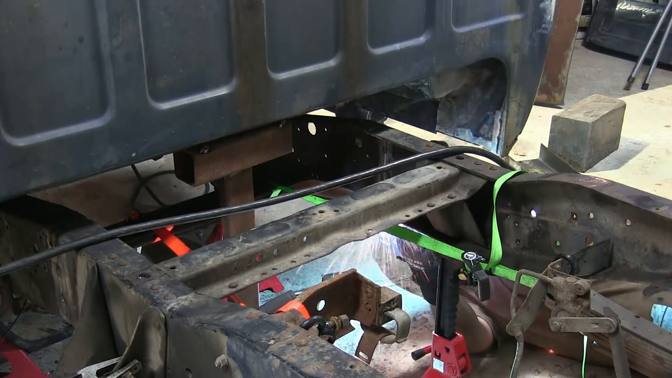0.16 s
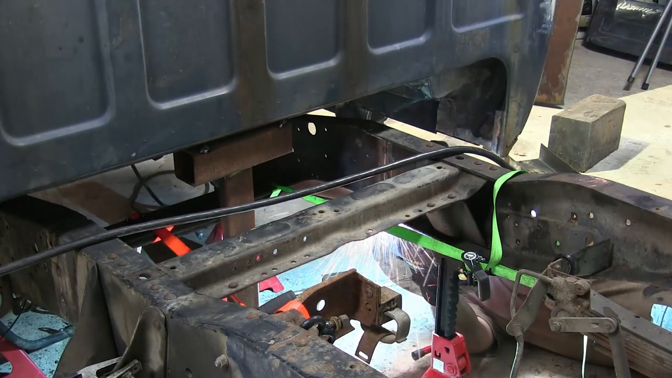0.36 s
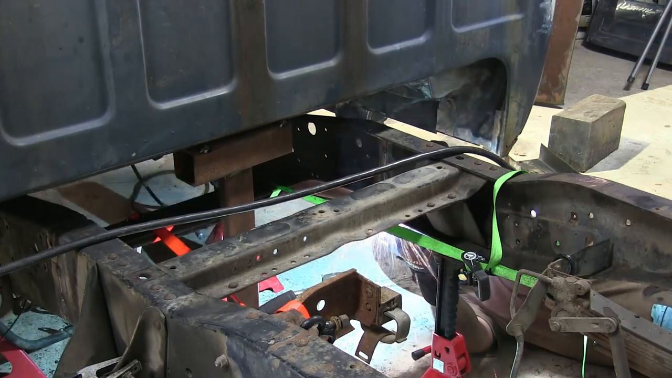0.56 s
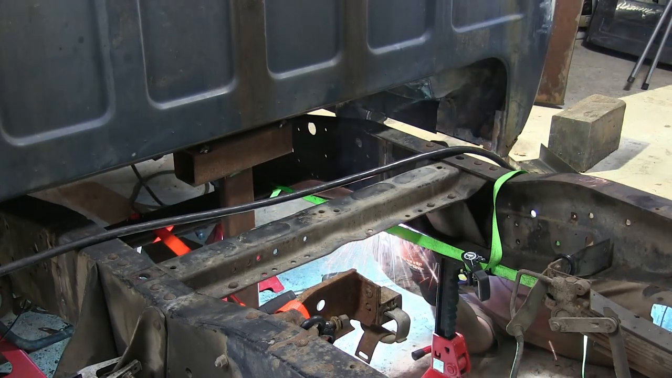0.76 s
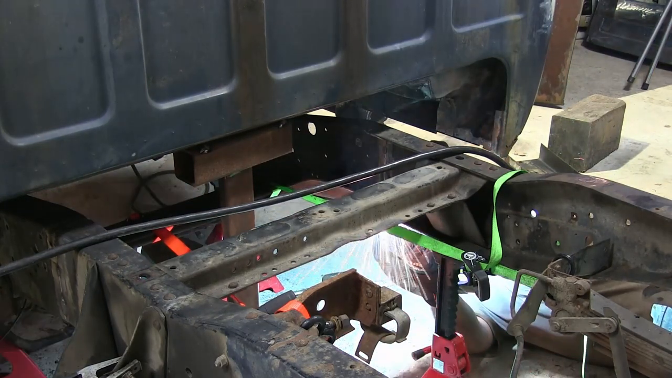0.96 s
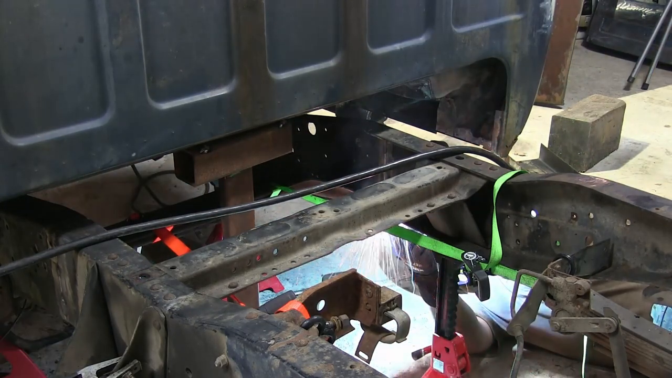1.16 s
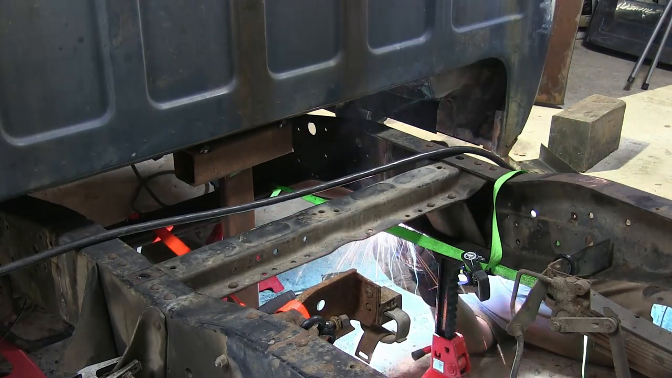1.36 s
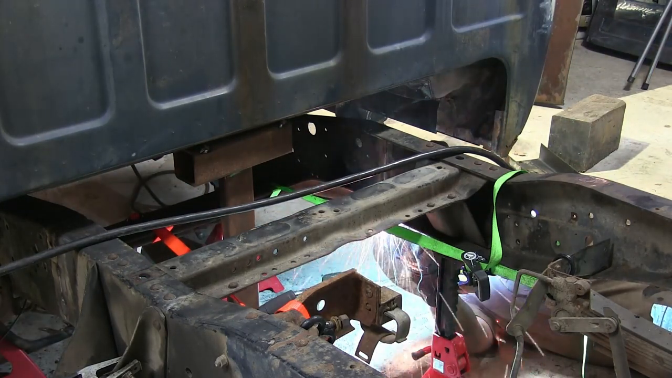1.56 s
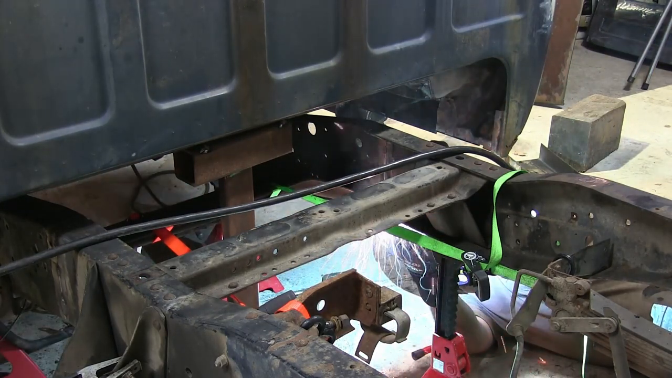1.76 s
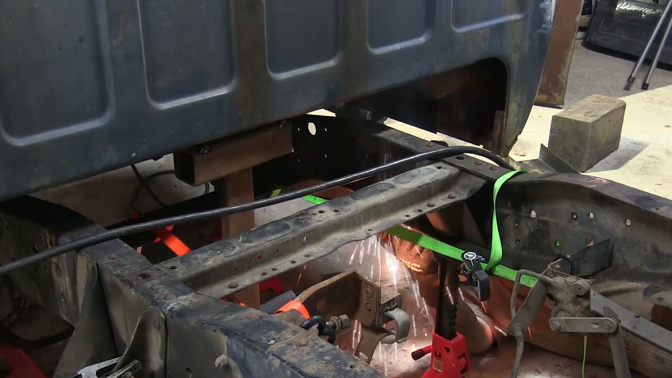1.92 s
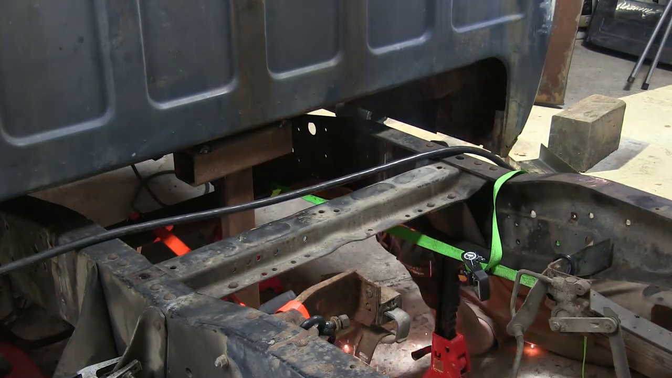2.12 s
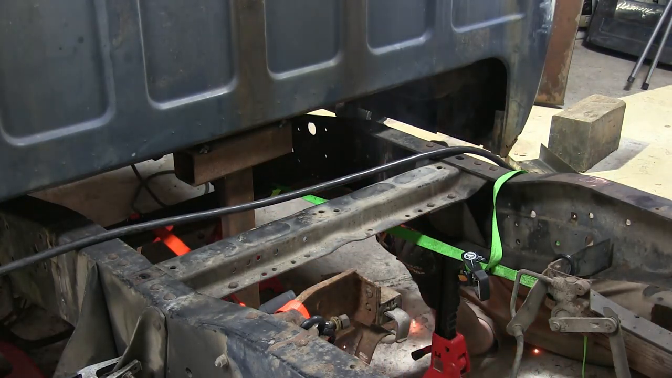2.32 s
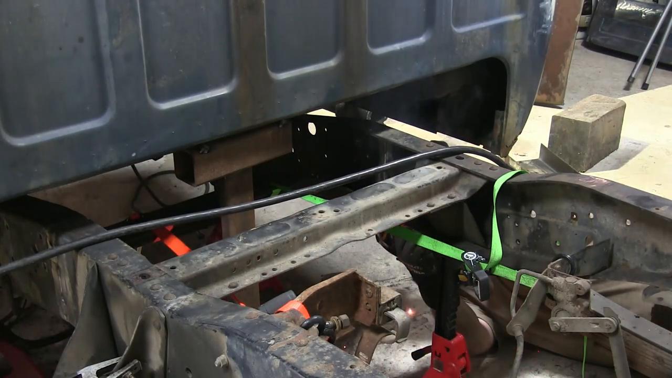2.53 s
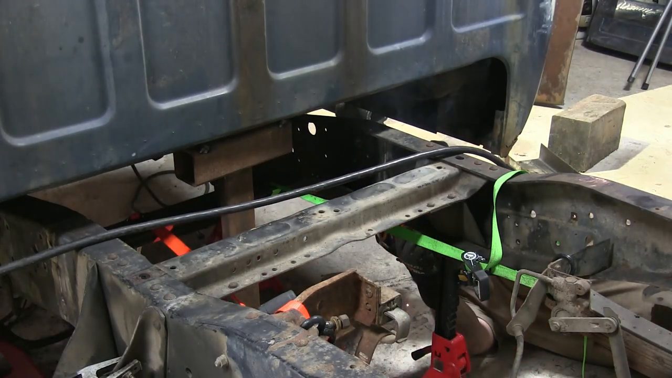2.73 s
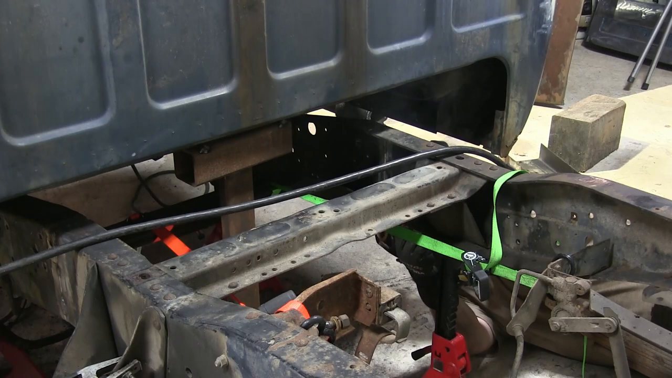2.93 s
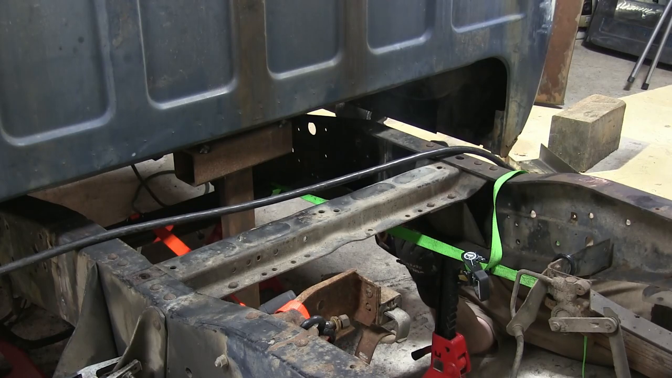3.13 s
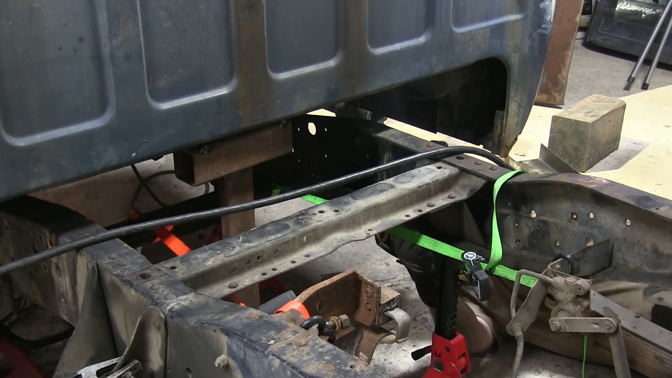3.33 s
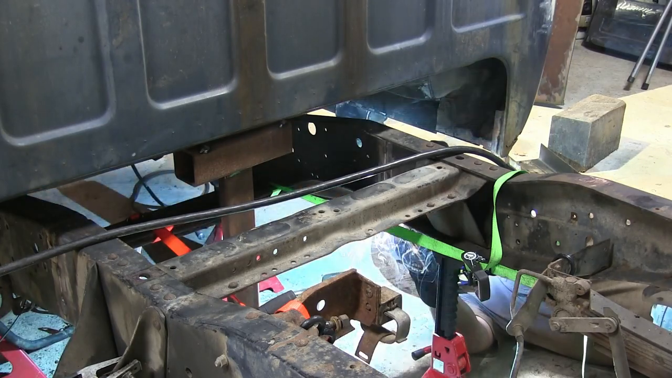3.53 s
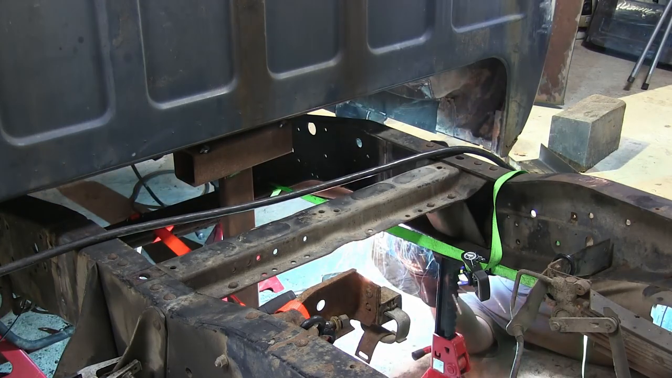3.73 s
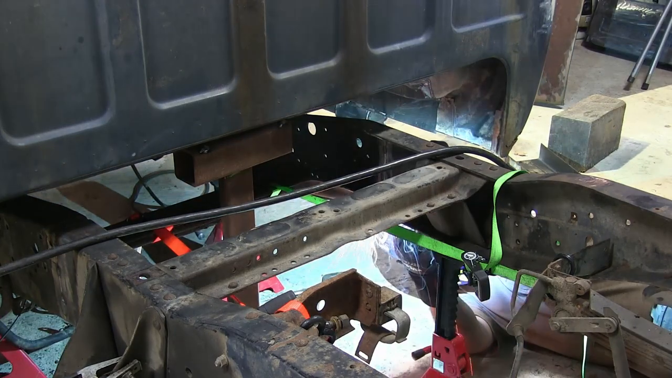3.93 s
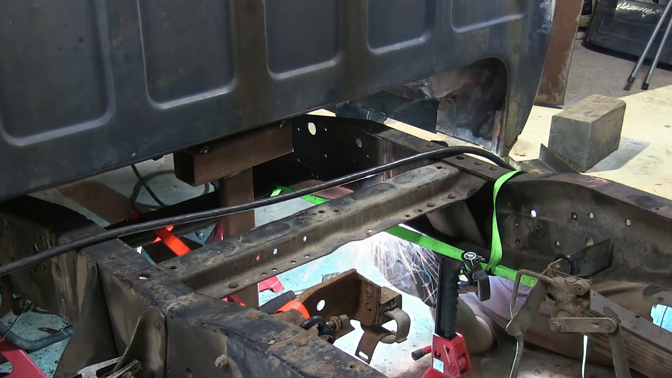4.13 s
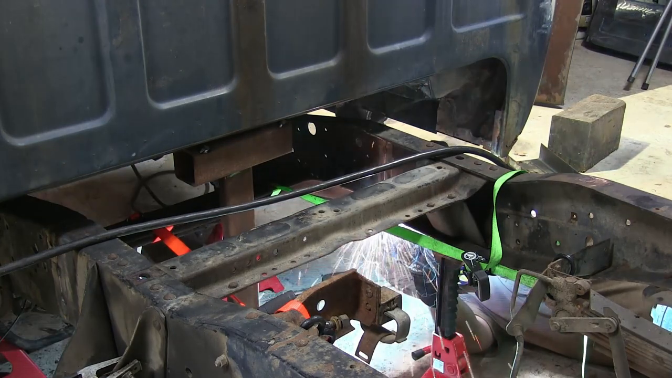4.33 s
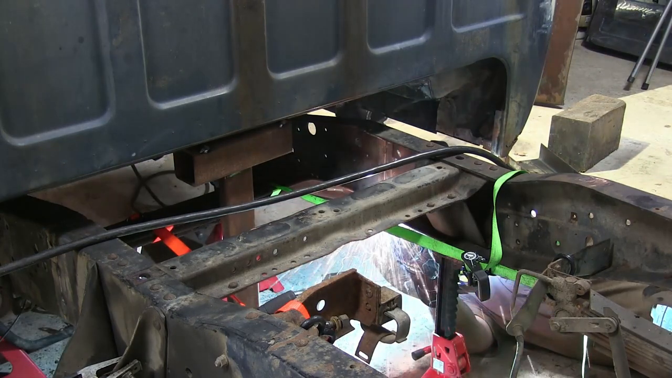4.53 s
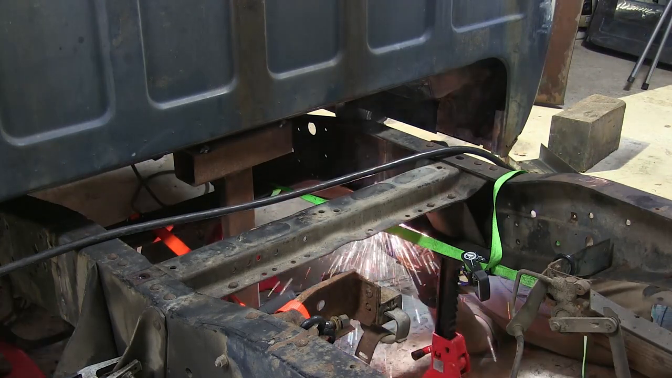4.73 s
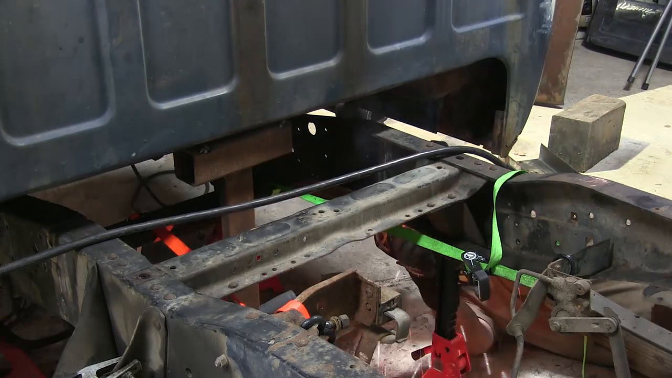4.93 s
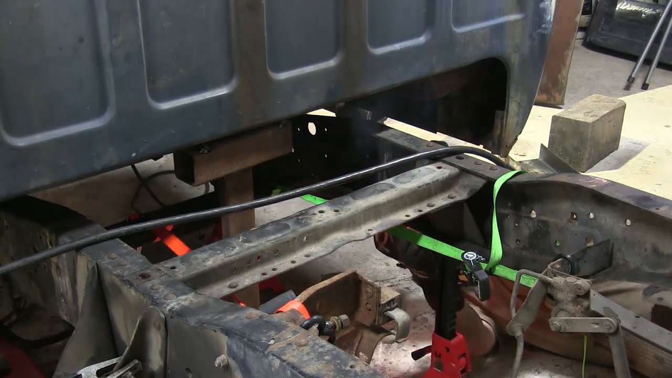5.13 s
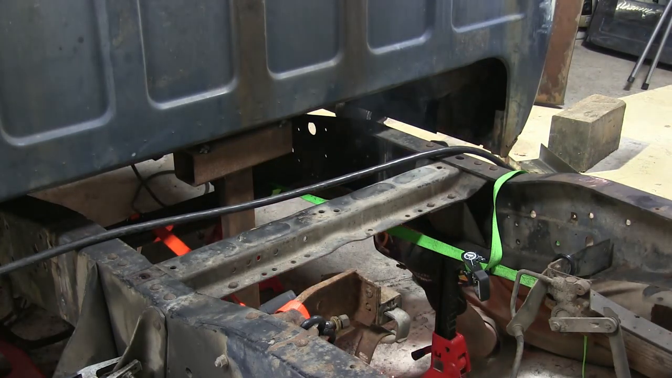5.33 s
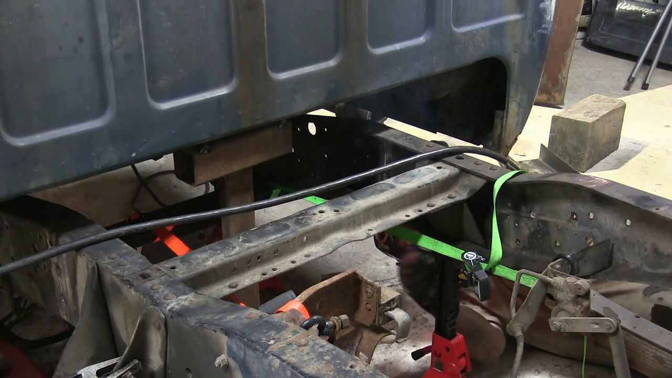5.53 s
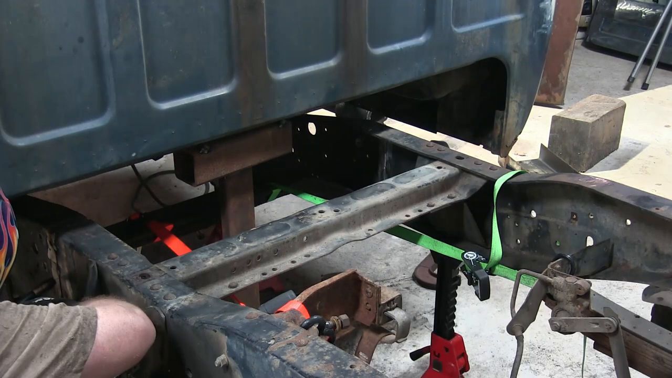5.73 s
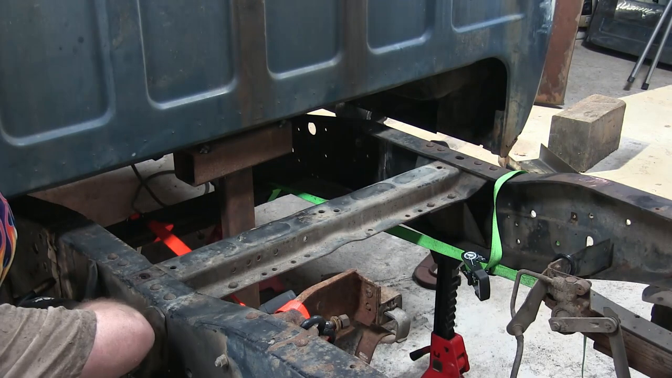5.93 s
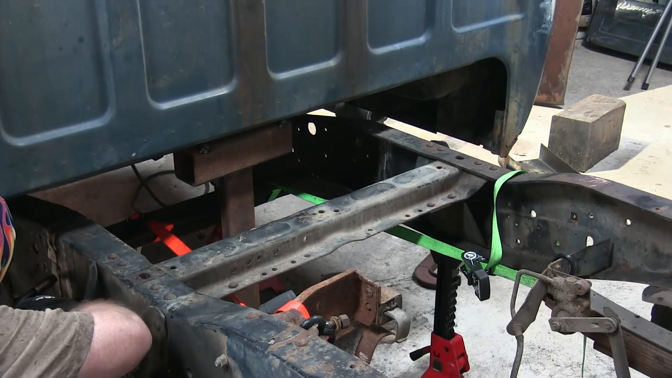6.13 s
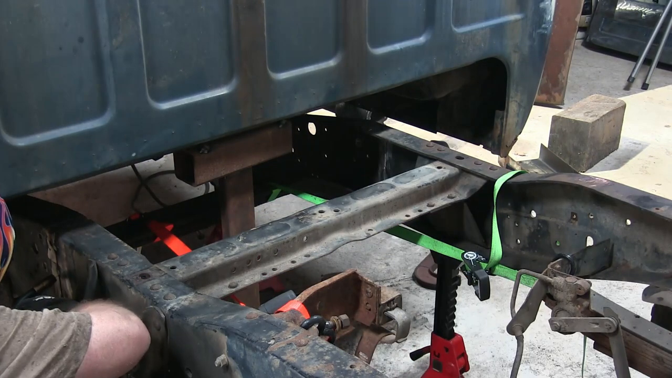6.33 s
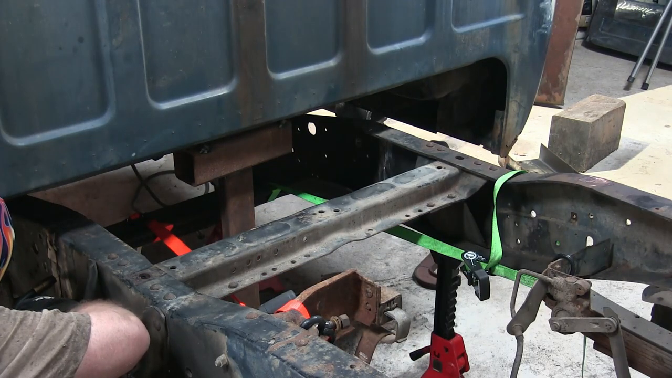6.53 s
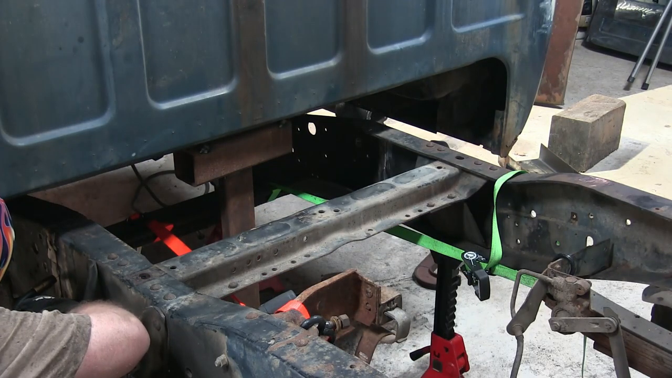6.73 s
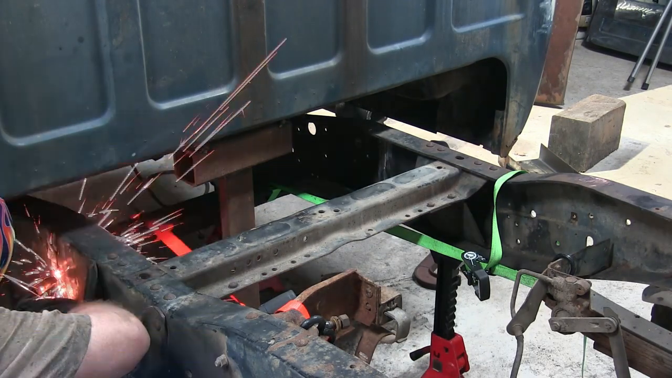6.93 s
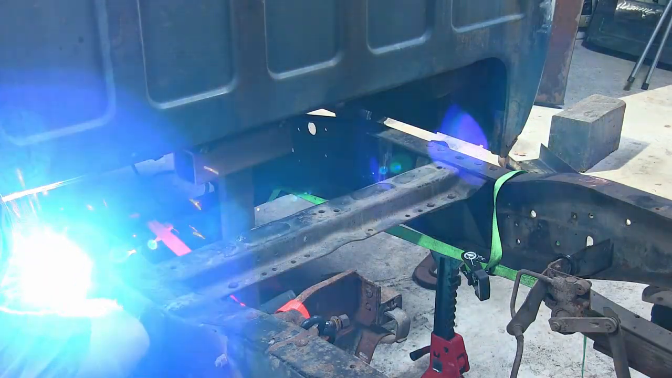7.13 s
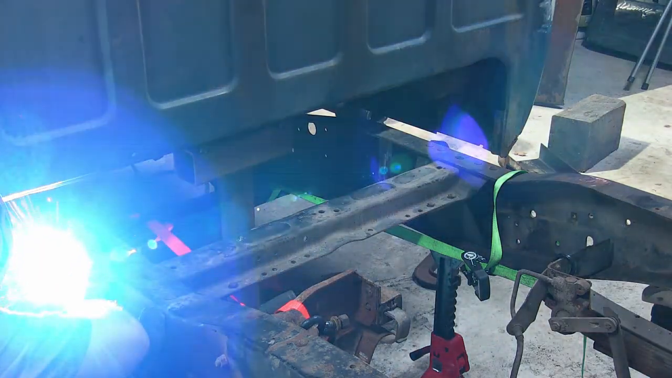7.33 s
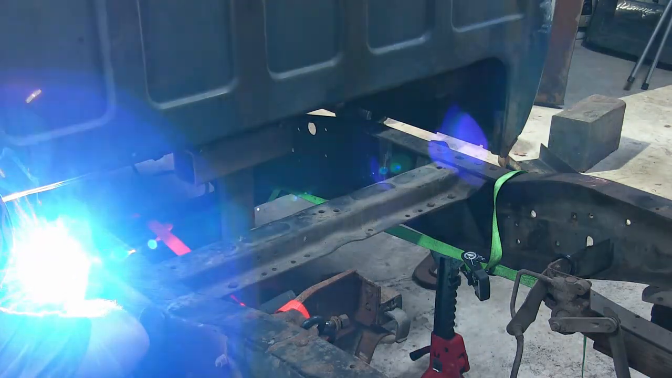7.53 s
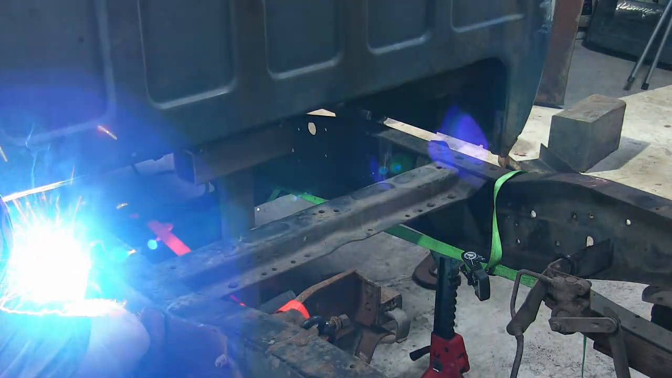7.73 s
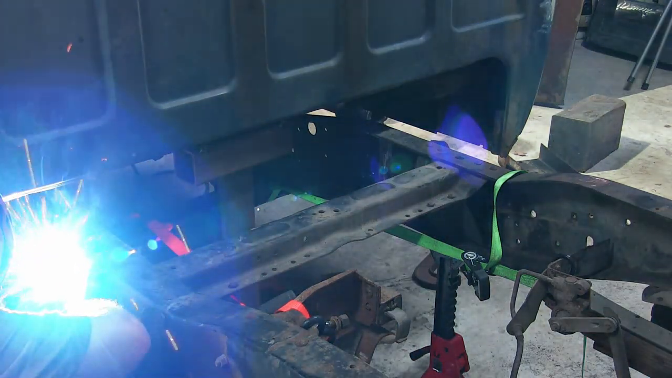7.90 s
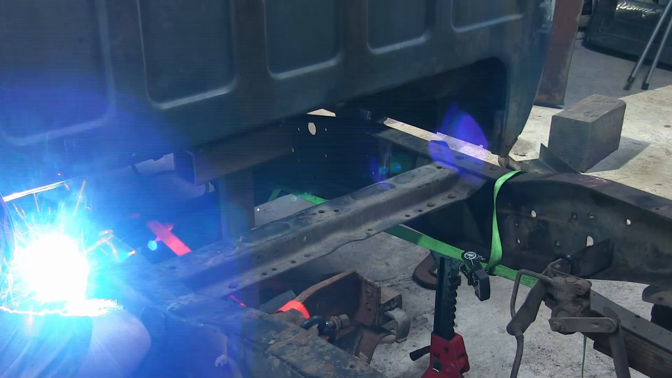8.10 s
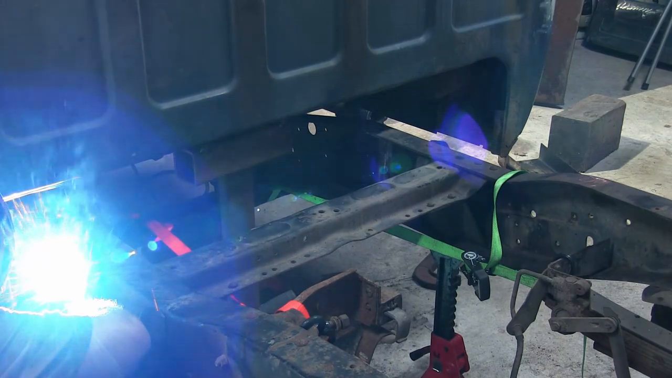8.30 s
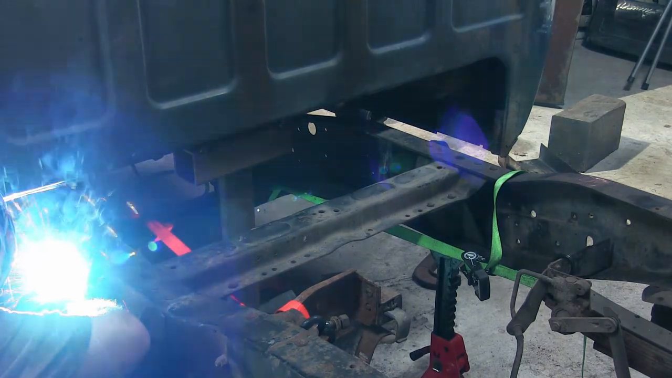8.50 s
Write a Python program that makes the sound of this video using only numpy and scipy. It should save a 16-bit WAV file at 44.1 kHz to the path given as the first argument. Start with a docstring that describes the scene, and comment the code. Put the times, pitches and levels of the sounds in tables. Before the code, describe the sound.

A wire-feed welder crackles and sizzles under a steel vehicle frame in a garage, with sharp pops of spatter. It stops, leaving the welder's low fan hum and a few faint ticks of cooling metal. A second, shorter run sputters in and ends. After another humming pause, a third run crackles nearer the microphone and slightly to the left, with a short room echo.

```python
"""Wire-feed welding in a garage

Two arc runs crackle under a steel vehicle frame, then the scene jumps to a third in the open beside it.
Every short circuit of the wire throws a cluster of tiny shock waves that ring in the steel and fill the
room; drops pop and the bead ticks as it cools. The welder's fan hums at one level, but a limiter ducks
everything under the sharp spatter, so the hum sinks during each run and swells back in the pauses."""
import sys
import numpy as np
from scipy import signal
from scipy.fft import rfft, irfft, next_fast_len
from scipy.io import wavfile
from scipy.ndimage import uniform_filter1d, minimum_filter1d, map_coordinates

SR = 44100
rng = np.random.default_rng(int(sys.argv[2]) if len(sys.argv) > 2 else 0)


def output_pcm(signal):
    """Save a mono or channel-first signal as 16-bit PCM at the path in sys.argv[1].

    Samples are clipped to [-1, 1] before scaling.
    """
    pcm = np.clip(np.atleast_2d(signal).T, -1, 1) * 32767
    wavfile.write(sys.argv[1], SR, np.round(pcm).astype(np.int16))


N = 377496
T = np.arange(N) / SR

# The garage's tail. Each row: frequency in Hz, time to fall 60 dB in seconds.
GARAGE_DECAY = [(200, 1), (1000, 0.92), (4000, 0.57), (8000, 0.57), (14000, 0.34)]
# Stereo image of the room and of the fan's air. Each row: frequency in Hz, left-right likeness (1 is mono).
ROOM_LIKENESS = [(180, 0.96), (550, 0.8), (1650, 0.57), (5000, 0.46), (15000, 0.5)]
FAN_LIKENESS = [(60, .89), (180, 0.92), (550, 0.78), (1650, 0.53), (5000, 0.51), (15000, 0.79)]
# The fan's blade and housing tones. Each row: pitch in Hz, level in dB.
FAN_TONES = [(210.1, -6), (420, -29.5), (311.3, -33.5), (369.4, -34)]

# Tone curves of the fan's air, the small sounds and the arc at each spot.
# Each row: frequency in Hz, gain in dB.
FAN_AIR_EQ = [(30, -58), (64, -46), (150, -20), (200, -8.5), (260, -17.5), (420, -19), (755, -16.5),
              (883, -23.5), (1380, -23), (2150, -32.5), (3500, -38), (6500, -46), (10000, -55.5),
              (15800, -69)]
TICK_EQ = [(1000, -15), (8000, -6), (15000, -12)]
SPUTTER_EQ = [(60, -13), (250, 4), (1500, 3.0), (5000, 2.5), (9000, 7.0), (15000, -2)]
POP_EQ = [(100, -14), (1200, 0), (9000, 0), (15000, -3)]
SPATTER_EQ = [(100, -41), (2000, -16), (8000, -8.5), (15000, -12), (17500, 5.5), (22000, 7.5)]
UNDER_EQ = [(50, -41), (140, -3), (260, -1), (700, 1), (1100, -6.5), (1800, -6.5), (3300, -9), (5000, -1),
            (7400, -2), (8300, -7), (9500, -7), (11800, -6), (12600, -11), (14500, -9.5), (15600, -13.5)]
OPEN_EQ = [(50, -46), (140, -4.5), (260, 2.5), (700, 1.5), (1100, -0.5), (1800, -0.5), (3300, -5.5),
           (5000, -2.5), (7400, -1), (8300, -4.5), (10000, -0.5), (11800, 0), (13000, -3), (15600, -9)]
# Resonances and dips of the steel and its cavities. Each row: centre in Hz, width in Hz, lift in dB.
TICK_RESONANCES = [(11000, 2000, 16)]
UNDER_RESONANCES = [(1117, 63, 7.5), (1385, 330, 4.5), (1660, 140, 4.5), (1820, 61, -4.5), (1980, 100, 5),
                    (2220, 160, 0.5), (2550, 260, 8), (3093, 184, 8.5), (3586, 250, 6), (4130, 470, 5.5),
                    (4650, 200, 4.5), (4860, 45, 0.5), (5750, 200, 3), (6370, 60, 3.5), (6830, 190, 4),
                    (7550, 86, 4.5), (7850, 110, 5), (8440, 160, -5), (8750, 140, 4), (9470, 320, 4.5),
                    (10700, 120, 3.5), (10800, 110, -1), (11330, 59, 5), (11760, 70, -3)]
OPEN_RESONANCES = [(785, 21, 8.5), (950, 55, 5.2), (1200, 71, -3), (1390, 100, 2.5), (1570, 28, 5),
                   (1620, 40, 5), (2180, 40, 1), (2415, 77, 3.5), (2720, 52, -3), (4780, 56, 7),
                   (5040, 50, -2), (5380, 50, -2), (5650, 60, 6), (7000, 100, 6), (7800, 170, 2.5),
                   (9550, 200, 3.5)]

# The hot bead ticks as it cools. Each row: time in seconds, level in dB.
COOLING_TICKS = [(2.65, -48), (2.917, -47), (3.105, -52), (3.275, -48), (5.3, -52), (5.36, -52),
                 (5.41, -52)]
# Whistles in the arc. Each row: start and length in seconds, first and last pitch in Hz, level in dB.
ARC_WHISTLES = [(.07, .09, 2560, 2555, -28), (.19, .11, 2525, 2510, -28), (.39, .1, 3665, 3665, -32),
                (.73, .11, 11295, 11290, -29), (.885, .085, 2495, 2500, -26.5),
                (1.55, .12, 2520, 2490, -24), (1.66, .115, 2492, 2515, -26), (3.79, .07, 2515, 2510, -25),
                (3.88, .6, 2485, 2482, -36), (4.64, .09, 2515, 2515, -26)]
# Sputters of the wire; the rows at 3.558 and 6.916 s are each a faint, brief tick just ahead of the sputter.
# Each row: start and length in seconds, level in dB, low-pass cutoff in Hz.
SPUTTERS = [(3.558, .003, -45, 9000), (3.569, .013, -32, 10000), (3.583, .016, -24.5, 2800),
            (3.592, .022, -23, 16000), (3.645, .032, -22.5, 12000), (1.227, .032, -19, 10000),
            (6.916, .005, -46, 9000), (6.928, .012, -40, 11000), (6.941, .013, -37.5, 5500),
            (6.955, .027, -47, 10000), (6.9825, .02, -29.5, 15000)]
# Big molten drops burst. Each row: time in seconds, level in dB, pitch in Hz.
DROP_POPS = [(.1612, -6, 6400), (.8995, -5, 4800), (1.0565, 0, 5900), (1.0695, 1, 8200), (1.2325, 4, 5000),
             (1.247, 2, 5000), (1.6295, -1, 5500), (1.6709, -1, 6300), (1.8244, -1.5, 5200),
             (1.9653, -3, 5500), (3.5945, -2, 4700), (3.6075, -4, 7500), (3.6467, 1.5, 4800),
             (3.6525, -1.5, 6500), (3.66, -3, 6000), (4.1727, -3, 4200), (4.3152, -7, 4000),
             (4.378, -5, 6000), (4.4303, -1, 5000), (4.4434, -1, 7800), (4.7415, -2, 4500),
             (6.9305, -21, 4800), (6.9828, -14, 12000), (6.9855, -9.5, 5000), (6.9987, -8, 9000),
             (7.047, -7, 4200), (7.067, -6, 4200), (7.091, -4, 4200), (7.141, 0, 2600), (7.1522, 1, 3900),
             (7.4312, 0, 3600), (7.5825, 1, 4500), (7.6155, 2, 4400), (7.6524, 0.5, 3000),
             (7.7107, 3, 5000), (7.918, -1, 2900), (7.954, 0, 2800), (8.3874, -1, 3700)]
# Fader moves for the three runs. Each row: time in seconds, spatter level in dB, crackle level in dB.
FIRST_RUN_FADERS = [(-.3, -15, -29), (.15, -2.5, -20), (.25, -3.5, -24), (.33, -8, -24.5), (.44, -5, -18.5),
                    (.54, -1, -25.5), (.6, -12, -19.5), (.78, -8, -23), (.9, -5.5, -20.5), (.97, -3, -19.5),
                    (1.07, 3.5, -19.5), (1.18, 6.5, -20), (1.34, 2.5, -19.5), (1.45, 1, -20),
                    (1.53, 0.5, -19), (1.62, 0, -21.5), (1.77, -8.5, -19), (1.88, 0.5, -21.5),
                    (1.999, -3.5, -22)]
SECOND_RUN_FADERS = [(3.595, 1, -18.5), (3.68, -2, -21), (3.77, -2.5, -21.5), (3.9, -3, -20),
                     (4.14, -3.5, -21.5), (4.34, -5.5, -23), (4.42, -0.5, -20.5), (4.48, 3, -19),
                     (4.63, 0, -18.5), (4.75, 0.5, -18.5), (4.801, -2.5, -18.5)]
OPEN_RUN_FADERS = [(6.986, -12, -34.5), (7.06, -0.5, -23.5), (7.15, 9.5, -16), (7.4, 6.5, -15.5),
                   (7.6, 7.5, -17), (7.73, 9.5, -16), (7.86, 8.5, -13.5), (7.98, 8.5, -18), (8.08, 4, -22),
                   (8.3, 5.5, -16.5), (8.56, 3, -21.5)]

SCENE_CHANGE_S = 5.632  # from under the frame to out in the open


def amp(db):
    """Decibels to gain."""
    return 10 ** (np.asarray(db) / 20)


def unit(x):
    """Scale to rms 1."""
    return x / np.sqrt(np.mean(x ** 2) + 1e-20)


def along(curve, hz):
    """Read a curve on a log frequency axis."""
    f, values = np.transpose(curve)
    return np.interp(np.log(hz + 1), np.log(f + 1), values)


def wobble(rate):
    """A smooth random curve with `rate` knots a second."""
    return map_coordinates(rng.standard_normal(int(N * rate / SR) + 4), [T * rate])


def gate(start, end):
    """Open between two times, with millisecond fades."""
    return np.clip(np.minimum(T - start, end - T) * 1000, 0, 1)


def filtered(x, response):
    """Filter by a response given as a function of Hz."""
    size = next_fast_len(N + SR // 4)
    return irfft(rfft(x, size) * response(np.fft.rfftfreq(size, 1 / SR)), size)[..., :N]


def pan(left_db):
    """Channel gains that put the left this many dB above the right."""
    return amp([[left_db / 2], [-left_db / 2]])


def spread(pair, likeness):
    """Two unrelated signals become left and right of a given likeness."""
    angle = lambda hz: np.arccos(np.clip(along(likeness, hz), -1, 1)) / 2
    mid, side = filtered(pair, lambda hz: np.array([np.cos(angle(hz)), np.sin(angle(hz))]))
    return np.array([mid + side, mid - side])


def clicks(events):
    """One sharp pressure dip for each time and level."""
    times, db = np.transpose(events)
    return -np.bincount(np.round(times * SR).astype(int), amp(db), N)[:N]


def ring(x, eq, resonances=(), size=8192):
    """A broad EQ with resonances on top; minimum phase, so the ringing follows each hit."""
    hz = np.fft.rfftfreq(size, 1 / SR)
    peaks_db = sum(lift / (1 + (2 * (hz - f) / width) ** 2) for f, width, lift in resonances)
    cepstrum = irfft(np.log(amp(along(eq, hz) + peaks_db)))
    cepstrum[1:size // 2] *= 2
    cepstrum[size // 2 + 1:] = 0
    return signal.fftconvolve(x, irfft(np.exp(rfft(cepstrum))))[:N]


def edge_smear(x, hz, width_hz):
    """Bending round steel edges smears each shock into a short wiggle: an all-pass."""
    pole = lambda f: hz ** 2 - f * f + 1j * f * width_hz
    return filtered(x, lambda f: np.conj(pole(f)) / pole(f))


def garage(x, near_db, room_db, near_t60=0.071, drift_hz=0.4488):
    """Direct sound, quick scatter off the frame and floor, and the long tail of the room."""
    def echoes(send):
        hz, t, spectrum = signal.stft(rng.standard_normal((2, SR * 3 // 4)), SR, nperseg=256)
        decay = amp(-60 * t / along(GARAGE_DECAY, hz)[:, None])
        tail = signal.istft(spectrum * decay, SR, nperseg=256)[1]
        t = np.arange(tail.shape[1]) / SR
        scatter = rng.standard_normal(tail.shape) * amp(-60 * t / near_t60)
        build_up = 1 - np.exp(-t / .004)
        reflections = amp(room_db) * unit(tail * build_up) + amp(near_db) * unit(scatter * build_up)
        impulse = spread(reflections, ROOM_LIKENESS)[:, :len(t)]
        return signal.fftconvolve(send[None], impulse / np.sqrt(len(t)), axes=1)[:, :N]
    drift = 2 * np.pi * drift_hz * T  # the reflections shift as the torch travels
    return x + echoes(x * np.cos(drift)) + echoes(x * np.sin(drift))


def fan():
    """The bed: the cooling fan's slightly unsteady blade and housing tones over rushing air."""
    clock = T + np.cumsum(.002 * wobble(6)) / SR
    hum = sum(amp(db + 0.5 * wobble(9.6)) * np.sin(2 * np.pi * (hz * clock + rng.random()))
              for hz, db in FAN_TONES)
    rush = filtered(rng.standard_normal((2, N)), lambda hz: amp(along(FAN_AIR_EQ, hz)))
    air = spread(rush, FAN_LIKENESS)
    return amp(-31.5) * (pan(-1.4) * unit(hum) + amp(-9.5) * pan(2.0) * unit(air))


def cooling_ticks():
    """The cooling bead ticks thinly in the pauses."""
    ticks = ring(clicks(COOLING_TICKS), TICK_EQ, TICK_RESONANCES)
    return garage(ticks, near_db=2, room_db=2, near_t60=.029)


def whistles(waver_hz=7, flutter_db=2.0):
    """Now and then a wavering note swells out of the crackle and glides a little."""
    notes = np.zeros(N)
    waver = waver_hz * wobble(60)
    for start, length, first_hz, last_hz, db in ARC_WHISTLES:
        progress = np.clip((T - start) / length, 0, 1)
        pitch = first_hz + (last_hz - first_hz) * progress + waver
        swell = np.sqrt(np.abs(np.sin(np.pi * progress)))
        notes += amp(db) * swell * np.sin(2 * np.pi * np.cumsum(pitch) / SR)
    return garage(notes * amp(flutter_db * wobble(70)), near_db=-18, room_db=-18)


def sparks(shorts_per_s, burst_s, scatter_db, snap, steady, colour_db, shocks_per_s=5000):
    """Each short circuit snaps as the arc relights, then sheds a dying cluster of small shocks."""
    gaps = np.exp(.6 * rng.standard_normal(4096)) / shorts_per_s
    onsets = (np.cumsum(gaps) * SR).astype(int)
    onsets = onsets[onsets < N]
    shorts = np.zeros(N)
    shorts[onsets] = amp(scatter_db * np.clip(rng.standard_normal(4096)[:len(onsets)], -2, 1.3))
    bursts = signal.lfilter([1], [1, -np.exp(-1 / (burst_s * SR))], shorts)
    shocks = (rng.random(N) < shocks_per_s / SR) * np.sign(rng.standard_normal(N))
    clusters = (steady + unit(bursts)) * shocks

    def band(hz):  # every snap gets its own mix of dull, middle and bright
        hits = shorts * amp(colour_db * rng.uniform(-4.0, 4.3, N))
        return filtered(hits, lambda f: 1j * f * hz / (hz * hz - f * f + 1j * f * hz))
    snaps = band(2220) + 0.45 * band(3750) + 0.13 * band(8200)
    return unit(unit(clusters) - snap * unit(snaps))


def sputters():
    """A faint tick, then dense sputters, dull or bright, before the arc holds; one more as the wire stubs."""
    shocks = sparks(350, burst_s=.001, scatter_db=1.5, snap=.3, steady=2, colour_db=1, shocks_per_s=20000)
    sputter = ring(shocks, SPUTTER_EQ, OPEN_RESONANCES)
    dulled = lambda hz: unit(signal.sosfilt(signal.butter(3, hz, fs=SR, output="sos"), sputter))
    bursts = sum(amp(db) * gate(start, start + length) * dulled(cutoff_hz)
                 for start, length, db, cutoff_hz in SPUTTERS)
    return garage(bursts, near_db=1, room_db=-3.5, near_t60=0.045)


def drop_pops(decay_cycles=1.8):
    """Each bursting drop snaps at its own pitch; under the frame the steel throws more of it back."""
    pops = np.zeros(N)
    t = np.arange(SR // 100) / SR
    for start, db, hz in DROP_POPS:
        snap = np.exp(-hz * t / decay_cycles) * np.cos(2 * np.pi * hz * t)
        pops[round(start * SR):][:len(t)] -= amp(db) * snap
    pops = ring(pops, POP_EQ)
    under = garage(pops * (T < SCENE_CHANGE_S), near_db=2, room_db=1, near_t60=.029)
    in_open = garage(pops * (T > SCENE_CHANGE_S), near_db=-3, room_db=-2, near_t60=.029)
    return under + pan(1.4) * in_open


def spatter(drops_per_s=50, unevenness=.4, scatter_db=1.06):
    """Fine droplets burst all through each run: needle-sharp ticks with tall peaks and little body."""
    droplets = []
    for run in (FIRST_RUN_FADERS, SECOND_RUN_FADERS, OPEN_RUN_FADERS):
        times, spatter_db, _ = np.transpose(run)
        gap, size = rng.standard_normal((512, 2)).T
        onsets = times[0] + np.cumsum(np.exp(unevenness * gap)) / drops_per_s
        levels = np.interp(onsets, times, spatter_db) + scatter_db * size
        droplets += [(t, db) for t, db in zip(onsets, levels) if 0 < t < times[-1]]
    return amp(4.5) * ring(clicks(droplets), SPATTER_EQ)


def weld_run(arc, faders, roar_db, sizzle_db, low_hz=1800, high_hz=9000):
    """One run in three bands: steady low roar, shifting mid crackle, top sizzle that grows with spatter."""
    times, spatter_db, crackle_db = np.transpose(faders)
    start, end = times[0], times[-1]
    # the roar builds as the pool melts and dies as the arc is drawn out
    roar = amp(roar_db) * np.clip(np.minimum((T - start) / 0.13, (end - T) / 0.04), 0, 1)
    crackle = amp(np.interp(T, times, crackle_db))
    sizzle = crackle * amp(sizzle_db + .3 * np.interp(T, times, spatter_db - spatter_db.mean()))
    below = lambda hz, edge: 1 / (1 + (hz / edge) ** 8)
    lows = unit(filtered(arc, lambda hz: below(hz, low_hz)))
    mids = unit(filtered(arc, lambda hz: below(hz, high_hz) - below(hz, low_hz)))
    highs = unit(filtered(arc, lambda hz: 1 - below(hz, high_hz)))
    return gate(start, end) * (roar * lows + crackle * mids + sizzle * highs)


def arc_under_frame():
    """Two runs ringing under the steel, mostly heard by reflection; the first sizzles brighter."""
    shocks = sparks(shorts_per_s=150, burst_s=0.0012, scatter_db=1.2, snap=0.44, steady=2.8, colour_db=2)
    arc = edge_smear(ring(shocks, UNDER_EQ, UNDER_RESONANCES), hz=4500, width_hz=1740)
    first = weld_run(arc, FIRST_RUN_FADERS, roar_db=-29, sizzle_db=0)
    second = weld_run(arc, SECOND_RUN_FADERS, roar_db=-29, sizzle_db=-1.5)
    return amp(-4.0) * pan(0.25) * garage(first + second, near_db=-4.0, room_db=0.5)


def arc_in_open():
    """The last run, nearer and a little to the left, with sharper single snaps."""
    shocks = sparks(shorts_per_s=135, burst_s=0.0015, scatter_db=1.2, snap=.5, steady=4, colour_db=1.5)
    arc = edge_smear(ring(shocks, OPEN_EQ, OPEN_RESONANCES), hz=2390, width_hz=480)
    run = weld_run(arc, OPEN_RUN_FADERS, roar_db=-24.5, sizzle_db=-7)
    return amp(-2.5) * pan(1.2) * garage(run, near_db=-3.0, room_db=2.5)


def scene():
    """The mix: the arc and its small sounds over the fan."""
    arcs = arc_under_frame() + arc_in_open()
    return arcs + whistles() + sputters() + spatter() + drop_pops() + cooling_ticks() + fan()


def limiter_gain(x, ceiling_db=-20, look_ahead_s=0.016, slow_range_db=10.5):
    """Ducks just ahead of each peak over the ceiling; releases fast, then slowly for the last decibels."""
    t = np.arange(x.shape[1]) / SR
    ahead = int(look_ahead_s * SR)
    peak_db = 20 * np.log10(np.abs(x).max(axis=0) + 1e-9)
    held_db = minimum_filter1d(np.minimum(0, ceiling_db - peak_db), 2 * ahead)
    release = lambda db, db_per_s: np.minimum.accumulate(db - db_per_s * t) + db_per_s * t
    fast = release(held_db, db_per_s=35.5)
    slow = release(np.maximum(held_db, -slow_range_db), db_per_s=2.5)
    return amp(uniform_filter1d(np.minimum(fast, slow), ahead))


def record(dry):
    """The master chain: a limiter that starts at rest in each scene, then a steep high cut."""
    scenes = np.split(dry, [round(SCENE_CHANGE_S * SR)], axis=1)
    gain = uniform_filter1d(np.concatenate([limiter_gain(part) for part in scenes]), size=220)
    return filtered(dry * gain, lambda hz: 1 / (1 + (hz / 15850) ** 300))


dry = scene()
out = record(dry)
output_pcm(out)
```